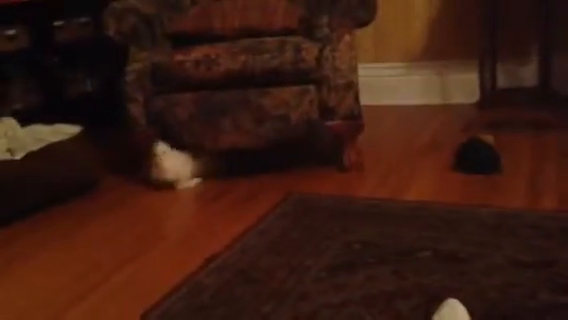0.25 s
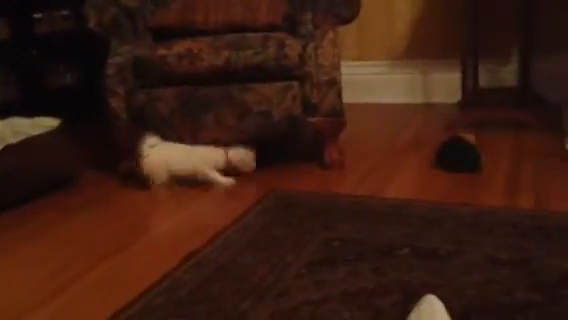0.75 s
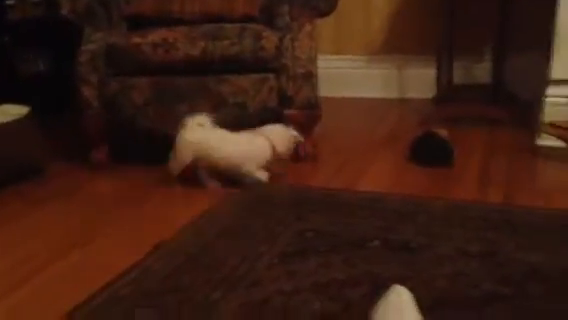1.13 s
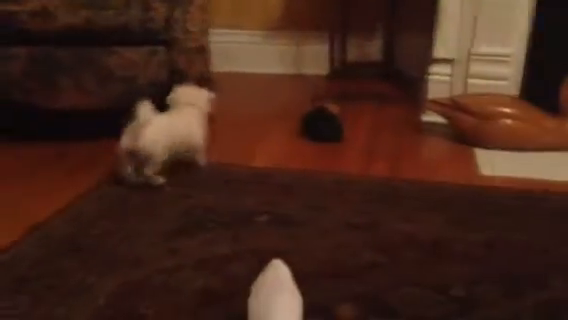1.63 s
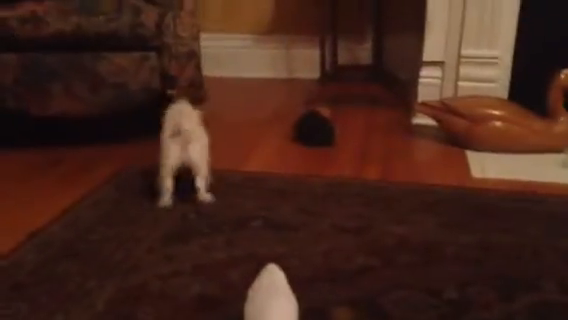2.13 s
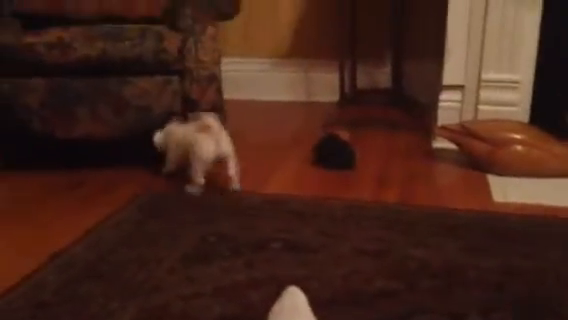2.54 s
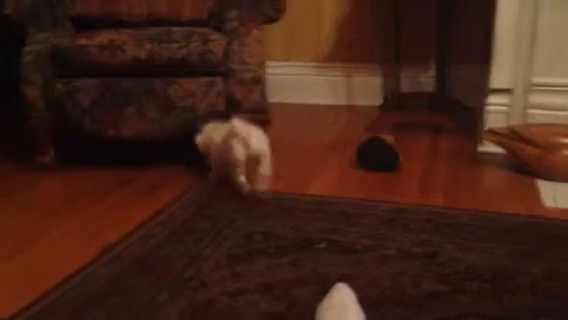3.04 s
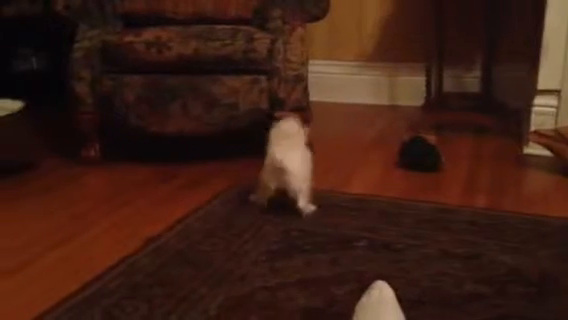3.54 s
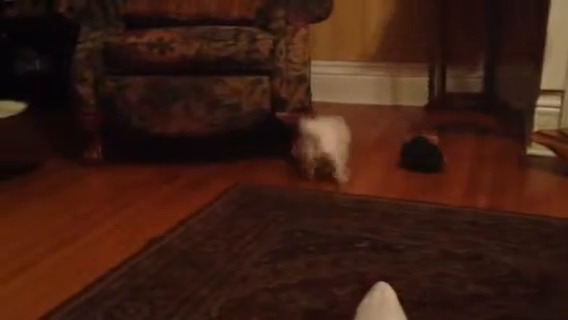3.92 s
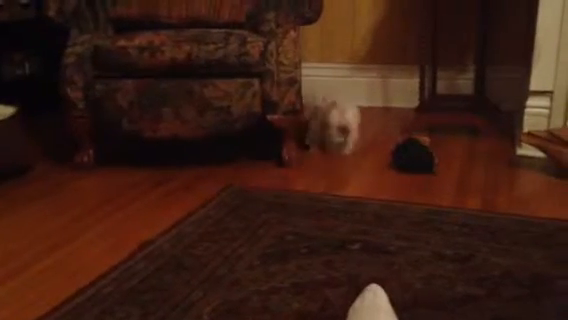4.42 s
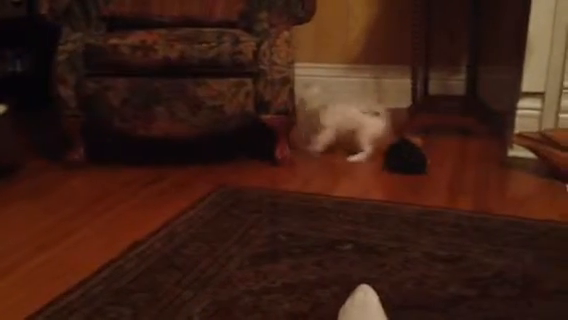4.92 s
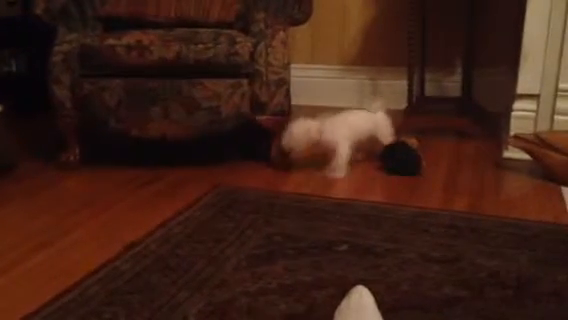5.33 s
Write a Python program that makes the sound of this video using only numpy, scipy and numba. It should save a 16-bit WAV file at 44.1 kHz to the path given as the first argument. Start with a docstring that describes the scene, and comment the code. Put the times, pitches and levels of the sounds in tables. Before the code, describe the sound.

A small puppy plays a few metres off on a wooden living-room floor, over faint, steady, bass-weighted background noise. The tail of a dull yap opens it, with soft hollow paw thumps and pattering. Around 0.5-0.65 s come tiny low grumbles; at 0.7-0.9 s a cluster of landings, scuffs and dry claw ticks. A loud, sharp yap at 1.35 s arches up in pitch and breaks hoarse, ringing briefly in the room. After a barely audible nose whistle near 2 s, yaps follow at about 2.15, 2.4, 2.85, 3.1 and 3.55 s, the last strongest. Light steps resume around 4 s. At 4.2 s a small growl winds upward into a weak, stifled yap at 4.4 s, then low grumbles until 4.9 s with a claw tick. A soft snort at 5.0 s ends in a thin whistle, and another strong raspy yap comes at 5.35 s. The small microphone lacks deep bass and extreme treble.

```python
"""Sharp, raspy yaps come first to the ear: a small puppy at play on a wooden living-room floor, a few metres off.
Each yap is one arch of pitch whose voice breaks from fairly clear to rough; pulsing folds feed throat resonances.
Between yaps come low grumbles, a rising growl, a noisy snort and thin nose whistles.
Paws ring the boards, claws tick, pads scuff; the room rings briefly over a faint steady background.
A small microphone hears it with little deep bass and no extreme treble."""
import sys
import numpy as np
from scipy import signal
from scipy.fft import rfft, irfft, next_fast_len
from scipy.io import wavfile
from scipy.ndimage import uniform_filter1d, minimum_filter1d
from numba import njit

SR = 44100
rng = np.random.default_rng(int(sys.argv[2]) if len(sys.argv) > 2 else 0)


def wav_record(signal):
    """Record a signal, one row per channel, as 16-bit PCM in the file named by sys.argv[1]."""
    frames = np.transpose(np.atleast_2d(signal))
    bounded = np.clip(frames, -1, 1)
    # unit amplitude maps onto the largest positive 16-bit level
    quanta = np.round(bounded * 32767).astype(np.int16)
    wavfile.write(sys.argv[1], SR, quanta)


N = 246078
TIME = np.arange(N) / SR

# Yaps: start [t/s], pitch rise [t/s], pitch fall [t/s], top pitch [f/Hz], held level [level/dB],
#   attack [t/s], release [level/dB per octave of fall], time before the break [t/s], roughness after it [0-1],
#   upper resonances [level/dB], mouth tuning [factor on f], treble [level/dB], fundamental [level/dB]
YAP_EVENTS = [ (-.12, 0.088, 0.084, 736.4, -23, .06, 23.5, .05, 1, -2.5, 1.07, -28, -29),
              (1.352, .115, 0.061, 723.8, -9.5, 0.14, 24, 0.12, 0.73, -2, 1.024, -1, 1),
              (2.162, 0.08, .066, 759.3, -13.5, 0.086, 13, .015, 0.72, -0.5, 0.99, -3, -0.5),
              (2.409, 0.084, 0.065, 722.8, -15, 0.055, 23.5, 0.032, 0.73, -5, 0.9, -8.5, 1),
              (2.845, .062, 0.09, 773.2, -14.5, 0.055, 17, 0.029, 0.65, -0.5, 0.97, -6.5, 1),
              (3.126, 0.099, 0.058, 732.4, -14.5, 0.089, 14.5, 0.06, 0.76, -0.5, .97, -4.5, 2.5),
              (3.537, .073, .08, 761.5, -9.5, .1, 21.5, 0.073, .75, 1.5, 1.024, -2, 1),
              (4.42, 0.055, .062, 607.4, -29, 0.089, 23.5, 0.028, 0.64, -2, 1.023, 6, -1),
              (5.348, 0.074, 0.076, 729, -12, 0.079, 15.5, 0.0844, 0.82, 0, 1.05, 2, -1.5), ]
# Throat resonances, mouth wide open: centre [f/Hz], width [f/Hz], gain [level/dB]
OPEN_THROAT = [(1336, 191, -1), (1814, 221, -1.5), (2452, 203, 1), (3286, 360, -5.5), (3943, 570, -13)]
# Throat resonances, jaws nearly shut: centre [f/Hz], width [f/Hz], gain [level/dB]
CLOSED_THROAT = [(1120, 160, -25), (1590, 94, 6.5), (2460, 140, -7), (3013, 164, -5), (4640, 240, -13.5)]
# Air rushing past the teeth: [f/Hz], spectrum [level/dB per Hz]
TEETH_SPECTRUM = [(4000, 5.5), (5500, 0), (7000, -12.5), (8800, -4.5), (11300, -2.5), (13500, -9),
                  (15000, -17)]
# Low grumbles: start [t/s], length [t/s], mid pitch [f/Hz], [level/dB], roughness [0-1], mouth tuning [factor]
GRUMBLE_EVENTS = [ (.464, 0.076, 269, -48.5, 0.66, 1.01), (0.52, 0.083, 244.4, -51.5, 0.66, 1.0),
                  (0.625, 0.035, 267.5, -38.5, 0.59, 0.998), (4.553, .26, 251.2, -49.5, 0.55, 0.94),
                  (4.803, 0.11, 255.7, -47, 0.64, 1.04), ]
# A growl winding up into a yap: [t/s], pitch [f/Hz], [level/dB], roughness [0-1]
RISING_GROWL = [(4.226, 256.2, -54, 0.48), (4.286, 277.2, -38, 0.48), (4.302, 287.6, -44, 0.27),
                (4.32, 348.3, -34, 0.47), (4.34, 374.8, -39, 0.48), (4.37, 371.5, -36, 0.47),
                (4.418, 463.6, -41, 0.01), (4.442, 523.6, -24.5, 0.25), (4.462, 567, -26.5, 0.4)]
# One snort through the nose: start [t/s], length [t/s], [level/dB]
SNORT_EVENT = (5.019, 0.11, -49.5)
# Snort noise: [f/Hz], spectrum [level/dB per Hz]
SNORT_SPECTRUM = [(88, -39.5), (150, -21), (312, 0), (343, -18), (567, -14), (674, -27), (1030, -24),
                  (1160, -15), (2450, -9.5), (3600, -20.5), (4540, -16.5), (15000, -35.5)]
# Thin nose whistles, one ending the snort: start [t/s], length [t/s], [level/dB], tuning [factor on f]
WHISTLE_EVENTS = [(1.96, 0.071, -66, 0.53), (5.078, 0.065, -53.5, 1)]
# Whistle noise: [f/Hz], spectrum [level/dB per Hz]
WHISTLE_SPECTRUM = [(2000, -39.5), (2240, -17), (2300, 4.5), (2360, -7.5), (2700, -39.5)]
# Heavier paw landings: [t/s], strength [level/dB], knock, a tilt of the modes about 150 Hz [level/dB per decade]
LANDINGS = [(.051, -31.5, 24.5), (.127, -43, -15), (0.227, -39.5, 2), (0.336, -45, -27.5),
            (0.722, -35.5, 15), (0.745, -30.5, 2), (0.783, -39.5, 17), (0.85, -34, -5), (1.059, -39, -3.5),
            (1.249, -54.5, 30), (1.295, -35, -23), (1.5, -35.5, -3), (2.713, -40.5, 9), (4.053, -45, -9),
            (4.121, -50, 17)]
# Floorboard modes: [f/Hz], [level/dB], 60 dB decay [t/s]
BOARD_MODES = [(57.4, -17.5, 0.23), (112, -3, 0.17), (171, -3, 0.074), (215, 4, 0.072), (299.4, 2, 0.06),
               (360, -13.5, 0.2), (580, -13, 0.063)]
# Light trotting between landings: from [t/s], to [t/s]
TROT_SPANS = [(.15, 1.85), (3.9, 8.2)]
# Claws on wood: [t/s], strength [level/dB]
CLAW_TICKS = [(0.7246, -49.5), (0.7956, -46.5), (0.8445, -53), (0.8854, -57), (1.3276, -52), (4.7954, -45)]
# Claw noise: [f/Hz], spectrum [level/dB per Hz]
CLAW_SPECTRUM = [(800, -11.5), (2500, -2.5), (4500, -2), (6500, 3.5), (8500, -5), (11000, -1), (15000, -11)]
# Paws sliding and scuffing: start [t/s], length [t/s], [level/dB]
SCUFF_EVENTS = [(.625, .05, -52.5), (.70, .08, -55), (.825, .07, -52), (1.155, .06, -66),
                (1.285, .07, -58.5), (2.65, .17, -52)]
# Scuff noise: [f/Hz], spectrum [level/dB per Hz]
SCUFF_SPECTRUM = [(300, 8), (600, -3.5), (1000, 6), (2200, 3), (4000, 1), (7000, -18.5), (14000, -30.5)]
# First echoes from floor and furniture: delay [t/s], [level/dB]
NEAR_ECHOES = [(.0009, -20), (.0043, -13), (.0079, -27.5)]
# Diffuse room decay: band centre [f/Hz], 60 dB decay [t/s]
ROOM_DECAY = [(150, .4), (400, 0.36), (1300, 0.38), (2600, 0.36), (5000, 0.24), (12000, 0.32)]
# Pitches at which the room rings most: [f/Hz], [level/dB], 60 dB decay [t/s]
RINGING_MODES = [(606, 9.5, 0.19), (740, -3, 0.41), (1275, -1.5, .47), (1210, -9, 0.84),
                 (1467, -10.5, 0.18), (2540, -4.5, 0.39)]
# Steady background: [f/Hz], spectrum [level/dB per Hz]
AMBIENCE_SPECTRUM = [(40, -10.5), (60, 0), (78, -7), (110, 0.5), (180, -14.5), (300, -13), (500, -15.5),
                     (900, -20.5), (1400, -18), (2000, -20), (4000, -21.5), (13500, -26.5), (15500, -34)]

SLACK_HZ = 277.1  # pitch of the slack folds, towards which a yap's ends tend
RISE_SHAPE, FALL_SHAPE = 2.6, 2.7  # exponents of the arch
YAP_ENDS = 1.5  # the voice stops this many fall times after the rise
ATTACK_DEPTH_DB, ATTACK_SHAPE = 42, 2.45  # a yap swells from this far down, fast at first
CLEAN_ROUGHNESS, BREAK_S = .32, .02  # roughness before the break; time the break takes
FALL_CLEARS = 0.29  # share of the roughness lost as the pitch sinks back
RASP_TAKES_DB = 9.5  # loss of fundamental per unit of roughness
ONSET_S = 0.0025  # the folds take this long to start and stop
GRUMBLE_ATTACK_S, GRUMBLE_RELEASE_S, GRUMBLE_SAG_HZ_PER_S = 0.017, 0.024, 77
GROWL_TREBLE_DB, GROWL_CHEST_DB = 3, -3.5
EDGE_DB = 15  # short sounds swell from, and die to, this far below their level
NOSE_ATTACK_S, NOSE_RELEASE_S = 0.01, 0.055
STEPS_PER_S, STEP_DB, STEP_SPREAD_DB, STEP_KNOCK_DB = 5.1, -45, 3, -12.5
SCUFF_ATTACK_S, SCUFF_RELEASE_S = 0.068, .04
AMBIENCE_DB = -64.5
CEILING, LIMITER_S, CUTOFF_HZ = .72, .004, 15550


def puppy():
    """Sharp yaps, low grumbles that sag in pitch, and one rising growl, all from the same vocal folds."""
    out = np.zeros(N)
    for start, *shape in YAP_EVENTS:
        add(out, yap(*shape), start)
    for start, length, hz, db, rough, tuning in GRUMBLE_EVENTS:
        t = np.arange(0, length, 1 / SR)
        pitch = hz - GRUMBLE_SAG_HZ_PER_S * (t - length / 2)
        level_db = db + swell(t, length, GRUMBLE_ATTACK_S, GRUMBLE_RELEASE_S)
        add(out, growl(t, pitch, level_db, rough, tuning), start)
    times, *controls = np.transpose(RISING_GROWL)
    t = np.arange(times[0], times[-1], 1 / SR)
    add(out, growl(t, *[np.interp(t, times, c) for c in controls]), times[0])
    return out * np.minimum(TIME / ONSET_S, 1)


def yap(rise_s, fall_s, top_hz, peak_db, attack_s, release_db, clean_s, roughness, upper_db, *voicing):
    """Pitch shoots up and sinks back; level swells, then falls with pitch; the voice breaks on the way."""
    t = np.arange(0, rise_s + YAP_ENDS * fall_s, 1 / SR)
    rising = 1 - np.maximum(1 - t / rise_s, 0) ** RISE_SHAPE
    falling = np.exp(-(np.maximum(t - rise_s, 0) / fall_s) ** FALL_SHAPE)
    pitch = SLACK_HZ + (top_hz - SLACK_HZ) * rising * falling
    level_db = peak_db - ATTACK_DEPTH_DB * np.maximum(1 - t / attack_s, 0) ** ATTACK_SHAPE
    level_db += release_db * np.log2(pitch / top_hz) * (t > rise_s)
    broken = np.clip((t - clean_s) / BREAK_S, 0, 1)
    rough = CLEAN_ROUGHNESS + (roughness - CLEAN_ROUGHNESS) * broken
    rough *= 1 - FALL_CLEARS * (1 - falling)
    resonances = [(hz, width, db + upper_db * (k > 0)) for k, (hz, width, db) in enumerate(OPEN_THROAT)]
    return call(t, pitch, level_db, rough, *voicing, resonances, jaw_glide=0.085,
                jitter=.055, doubling=.8, flutter_hz=279.1, shimmer_db=4.0,
                fundamental_db=-21.5, fundamental_slope=0.32, teeth_db=-28.0, effort_tilt=10.0)


def growl(t, pitch, level_db, rough, tuning=1):
    """The same voice through nearly shut jaws, with slower flutter and more uneven cycles."""
    return call(t, pitch, level_db, rough, tuning, GROWL_TREBLE_DB, GROWL_CHEST_DB, CLOSED_THROAT,
                jaw_glide=0.0025, jitter=.15, doubling=.7, flutter_hz=158.7, shimmer_db=6.0,
                fundamental_db=-10.5, fundamental_slope=0.59, teeth_db=-23, effort_tilt=0.0)


def call(t, pitch, level_db, rough, tuning, treble_db, chest_db, resonances, jaw_glide, jitter, doubling,
         flutter_hz, shimmer_db, fundamental_db, fundamental_slope, teeth_db, effort_tilt):
    """The vocal folds pulse; as they turn chaotic the period doubles and puffs of noise take over."""
    rough = np.clip(rough, .03, .95)
    # slack folds at low pitch keep time less well
    stray_hz = jitter * rough * np.sqrt(pitch.max() * pitch) * wobble(t, 520)
    phase = 2 * np.pi * np.cumsum(pitch + stray_hz) / SR
    orders = np.arange(2, 20)[:, None]
    # no two closures are timed alike, which frays the upper harmonics most
    closure = phase + .16 * wobble(t, 700)
    pulses = (np.cos(orders * closure) / orders ** 1.67).sum(0)
    # strong and weak pulses alternate, giving lines between the harmonics
    pulses *= 1 + doubling * rough * np.cos(phase / 2 + wobble(t, 60))
    # air escapes once a cycle
    puffs = rng.standard_normal(len(t)) * (1 + .9 * np.cos(phase))
    # the resonances sink as the jaws close again
    mouth = tuning * (1 + jaw_glide * np.linspace(1, -1, len(t)))
    tone = throat(pulses, resonances, mouth, top_hz=4410)
    rasp = throat(puffs, resonances, mouth, top_hz=4410)
    voice = even(np.sqrt(1 - rough ** 2) * tone + rough * rasp)
    # uneven cycles
    flutter = rms_one(from_db(shimmer_db * rough * np.tanh(wobble(t, flutter_hz))))
    # the rush of air is strongest as the call begins
    rush_db = teeth_db + 7 * np.linspace(1, -1, len(t))
    rush = from_db(rush_db) * colour(rng.standard_normal(len(t)), TEETH_SPECTRUM)
    voice = voice * flutter + rush
    # the mouth is widest at the top of the arch, where most treble gets out
    treble = signal.sosfiltfilt(signal.butter(2, 2800, "high", fs=SR, output="sos"), voice)
    treble_gain = from_db(treble_db + effort_tilt * np.log2(pitch / pitch.max()))
    voice = voice + treble * (treble_gain - 1)
    # the fundamental grows more slowly with effort than the overtones
    low_db = fundamental_db + chest_db + fundamental_slope * level_db - RASP_TAKES_DB * rough
    # and it stumbles when the folds are slack
    stumble = rough * (300 / pitch) * wobble(t, 200)
    fundamental = from_db(low_db) * flutter * np.sin(phase + stumble)
    fade = np.clip(np.minimum(t - t[0], t[-1] - t) / ONSET_S, 0, 1)
    return (from_db(level_db) * voice + fundamental) * fade


def throat(x, resonances, tuning, top_hz):
    """Parallel resonances of alternating sign; little gets out above the last one."""
    out = np.zeros(len(x))
    for k, (hz, width, db) in enumerate(resonances):
        radius = np.exp(-np.pi * width / SR)
        out += (-1) ** k * from_db(db) * resonate(x, radius, 2 * np.pi * hz * tuning / SR)
    out = signal.sosfilt(signal.butter(2, 240, "high", fs=SR, output="sos"), out)
    return even(signal.sosfilt(signal.butter(8, top_hz * tuning.mean(), fs=SR, output="sos"), out))


@njit
def resonate(x, radius, angle):
    """A two-pole resonance whose centre moves; gain 1 on top."""
    y = np.zeros(len(x))
    for i in range(2, len(x)):
        drive = (1 - radius ** 2) / 2 * (x[i] - x[i - 2])
        y[i] = drive + 2 * radius * np.cos(angle[i]) * y[i - 1] - radius ** 2 * y[i - 2]
    return y


def snort():
    """Turbulent air through the nose: one burst of grainy noise."""
    return hiss([SNORT_EVENT], NOSE_ATTACK_S, NOSE_RELEASE_S, SNORT_SPECTRUM, grain_db=2.5)


def whistles():
    """Thin nose whistles: noise squeezed into a narrow band."""
    out = np.zeros(N)
    for *burst, tuning in WHISTLE_EVENTS:
        out += hiss([burst], NOSE_ATTACK_S, NOSE_RELEASE_S, WHISTLE_SPECTRUM, grain_db=-2.0, tuning=tuning)
    return out


def paws():
    """A soft pad sets the boards ringing; a harder landing brings out the upper modes."""
    out, t = np.zeros(N), TIME[:SR // 3]
    hz, mode_db, t60 = np.transpose(BOARD_MODES)[:, :, None]
    chance = rng.standard_normal(size=(80, 2, len(BOARD_MODES), 1))
    for (start, peak_db, knock_db), (strength, detune) in zip(LANDINGS + light_steps(), chance):
        gain = from_db(mode_db + 2 * strength + knock_db * np.log10(hz / 150) - 60 * t / t60)
        modes = gain * np.sign(detune) * np.sin(2 * np.pi * hz * (1 + 0.11 * detune) * t)
        soft_contact = 1 - np.exp(-t / .005)
        add(out, from_db(peak_db - 5) * modes.sum(0) * soft_contact, start)
    return out


def light_steps(count=50):
    """An uneven patter during the trots, as rows like those of the heavier landings."""
    late, force = rng.standard_normal((count, 2)).T
    times = (np.arange(count) + late / 4) / STEPS_PER_S
    steps = []
    for start, f in zip(times, force):
        if any(a < start < b for a, b in TROT_SPANS):
            steps.append((start, STEP_DB + STEP_SPREAD_DB * f, STEP_KNOCK_DB))
    return steps


def claws():
    """Each claw gives a dry, bright tick: noise that dies within milliseconds."""
    out, t = np.zeros(N), TIME[:SR // 20]
    for start, peak_db in CLAW_TICKS:
        tick = colour(rng.standard_normal(len(t)), CLAW_SPECTRUM) * np.exp(-t / 0.0031)
        add(out, from_db(peak_db) * tick, start)
    return out


def scuffs():
    """Pads slide over the boards: grainy friction noise that swells and fades."""
    return hiss(SCUFF_EVENTS, SCUFF_ATTACK_S, SCUFF_RELEASE_S, SCUFF_SPECTRUM, grain_db=5.5)


def living_room(x, tail_db, build_s):
    """Direct sound, a few near echoes and modes, and a diffuse tail with its own decay in each band."""
    t = TIME[:int(.7 * SR)]
    hz, white = np.fft.rfftfreq(len(t), 1 / SR), rfft(rng.standard_normal(len(t)))
    centres = np.array(ROOM_DECAY)[:, 0]
    tail = np.zeros(len(t))
    # each band fades out towards its neighbours' centres
    for (centre, t60), share in zip(ROOM_DECAY, np.eye(len(ROOM_DECAY))):
        band = at_hz(np.c_[centres, share], hz)
        tail += irfft(white * band, len(t)) * from_db(-60 * t / t60)
    tail *= 1 - np.exp(-t / build_s)
    response = from_db(tail_db) * tail / np.sqrt(np.sum(tail ** 2))
    for mode_hz, mode_db, t60 in RINGING_MODES:
        ring = from_db(mode_db - 60 * t / t60) * np.cos(2 * np.pi * mode_hz * t)
        response += ring * 2 * np.log(1000) / (t60 * SR)  # long and short rings peak alike in frequency
    response[0] += 1
    for delay, echo_db in NEAR_ECHOES:
        response[int(abs(delay) * SR)] += from_db(echo_db)
    return signal.fftconvolve(x, response / np.sqrt(np.sum(response ** 2)))[:N]


def background():
    """Faint steady noise, weighted to the bass."""
    return from_db(AMBIENCE_DB) * colour(rng.standard_normal(N), AMBIENCE_SPECTRUM)


def hiss(bursts, attack_s, release_s, spectrum, grain_db, tuning=1):
    """Bursts of coloured noise with a randomly wandering, grainy level."""
    level = np.zeros(N)
    for start, length, db in bursts:
        level += from_db(db + swell(TIME - start, length, attack_s, release_s))
    grain = from_db(grain_db * wobble(TIME, 210))
    return level * grain * colour(rng.standard_normal(N), spectrum, tuning)


def swell(t, length, attack_s, release_s):
    """Attack, hold and release, in dB relative to the held level."""
    before = np.maximum(1 - t / attack_s, 0)
    after = np.maximum(1 - (length - t) / release_s, 0)
    return -EDGE_DB * (before + after)


def wobble(t, rate):
    """Random wander with `rate` turning points a second at most; spread near 1."""
    steps = (t - t[0]) * rate
    return np.interp(steps, np.arange(4096), rng.standard_normal(4096))


def colour(x, spectrum, tuning=1):
    """Shape a sound by a spectrum that falls away below its lowest point; rms 1."""
    size = next_fast_len(len(x))
    hz = np.fft.rfftfreq(size, 1 / SR) / tuning
    gain = from_db(at_hz(spectrum, hz)) * np.minimum(hz / spectrum[0][0], 1) ** 2
    return rms_one(irfft(rfft(x, size) * gain, size)[:len(x)])


def at_hz(points, hz):
    """Read a table on a log-frequency axis."""
    f, value = np.transpose(points)
    return np.interp(np.log(np.maximum(hz, 1)), np.log(f), value)


def even(x):
    """Hold the short-time rms (10 ms) at 1."""
    return x / np.sqrt(np.abs(uniform_filter1d(x * x, size=SR // 100)) + 1e-12)


def rms_one(x):
    """Scale to unit rms."""
    return x / np.sqrt(np.mean(x ** 2) + 1e-20)


def from_db(db):
    """Decibels to gain."""
    return 10 ** (np.asarray(db) / 20)


def add(out, sound, start):
    """Mix a sound in at a time in seconds, trimmed to the scene."""
    at = int(round(start * SR))
    sound = sound[max(-at, 0):max(N - at, 0)]
    out[max(at, 0):max(at, 0) + len(sound)] += sound


def scene():
    """The puppy and its feet in the room, over a faint steady background."""
    voice = puppy() + snort() + whistles()
    feet = paws() + claws() + scuffs()
    in_room = living_room(voice + feet, tail_db=-1.0, build_s=0.00043)
    return (in_room + background())[None]


def record(dry):
    """The small microphone loses the deep bass; a quick limiter holds the peaks; the top is cut."""
    thin = signal.sosfilt(signal.butter(3, 38, "high", fs=SR, output="sos"), dry)
    span = int(LIMITER_S * SR)
    needed_gain = CEILING / np.maximum(np.abs(thin), CEILING)
    gain = uniform_filter1d(minimum_filter1d(needed_gain, size=span), size=span)
    return signal.sosfilt(signal.ellip(10, .1, 90, CUTOFF_HZ, fs=SR, output="sos"), thin * gain)


dry = scene()
out = record(dry)
wav_record(out)
```